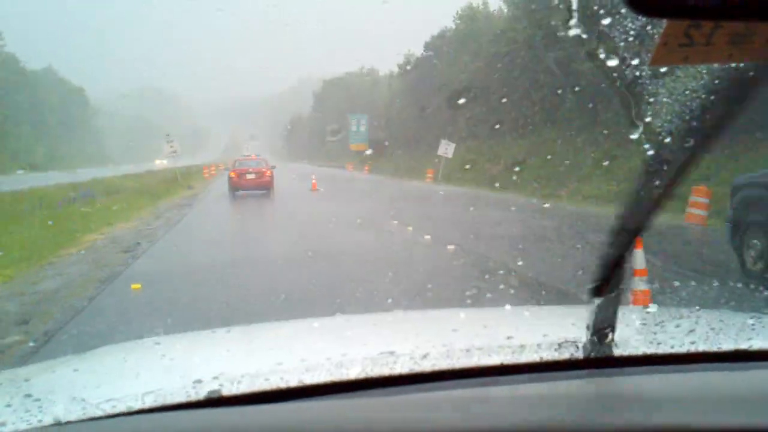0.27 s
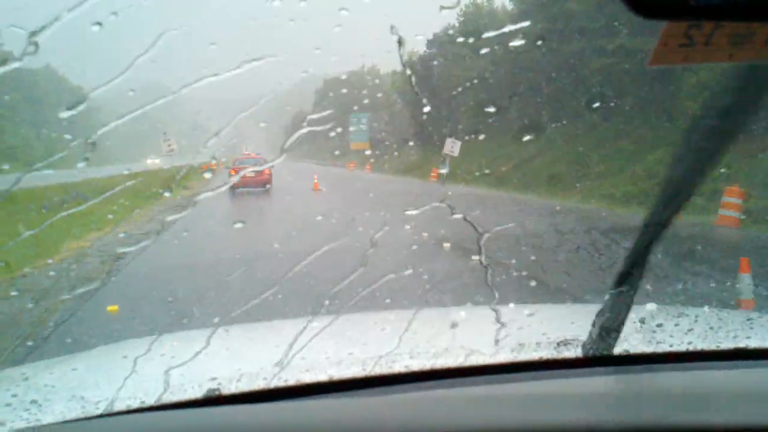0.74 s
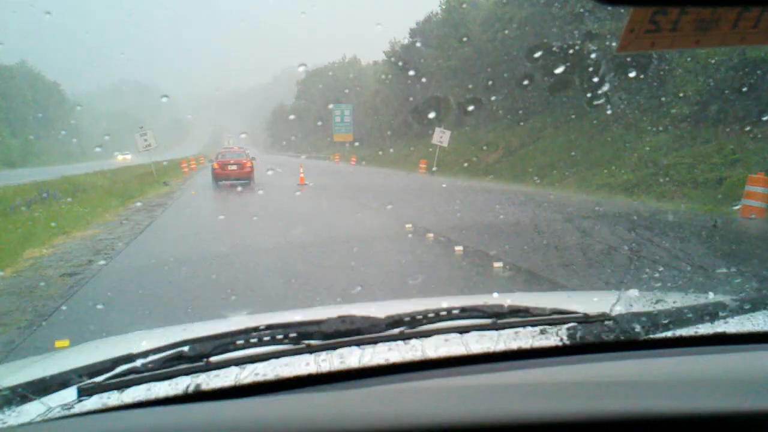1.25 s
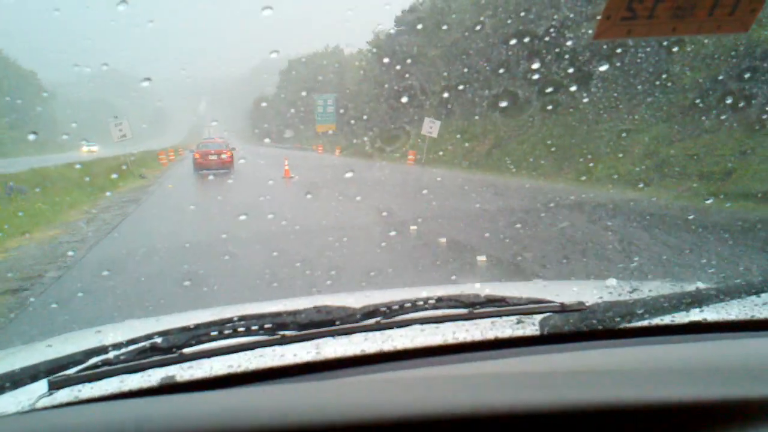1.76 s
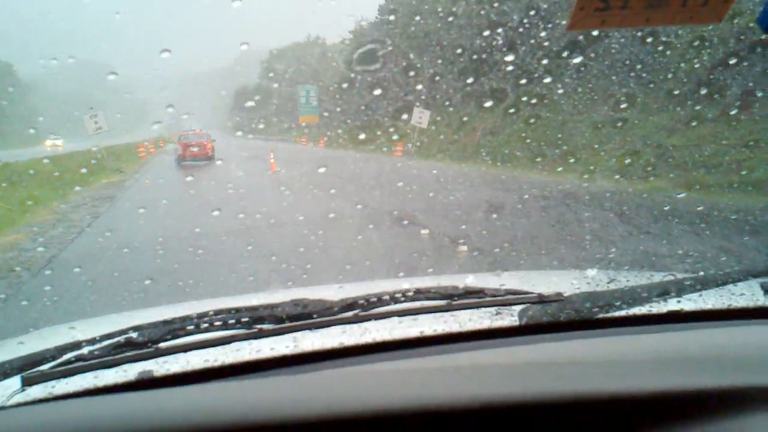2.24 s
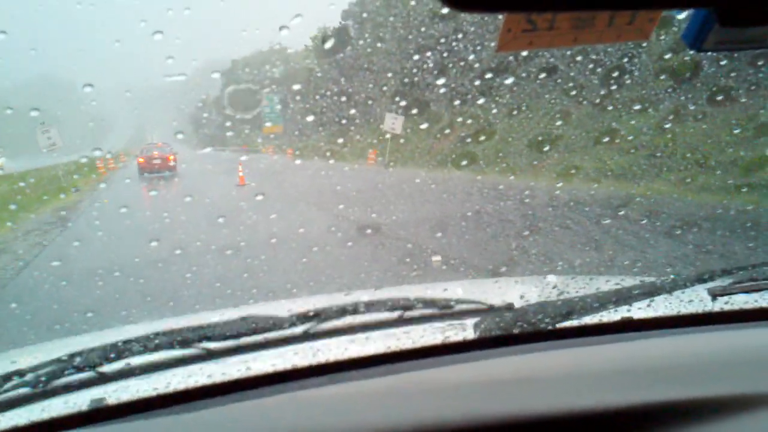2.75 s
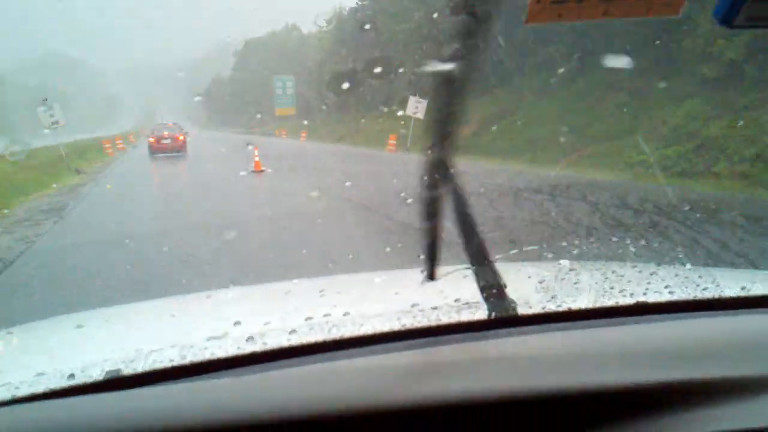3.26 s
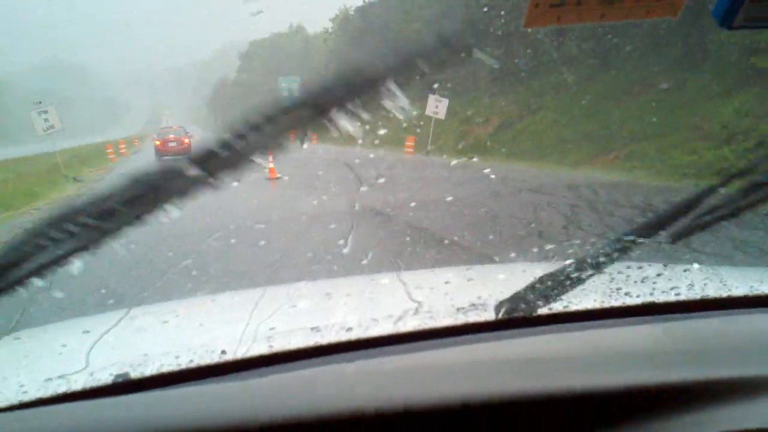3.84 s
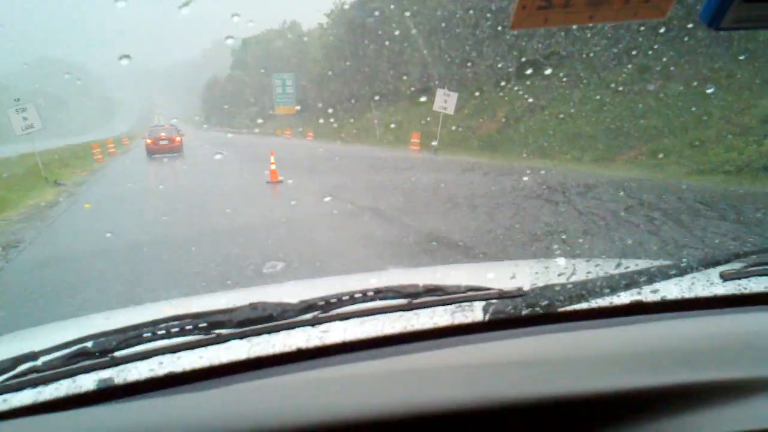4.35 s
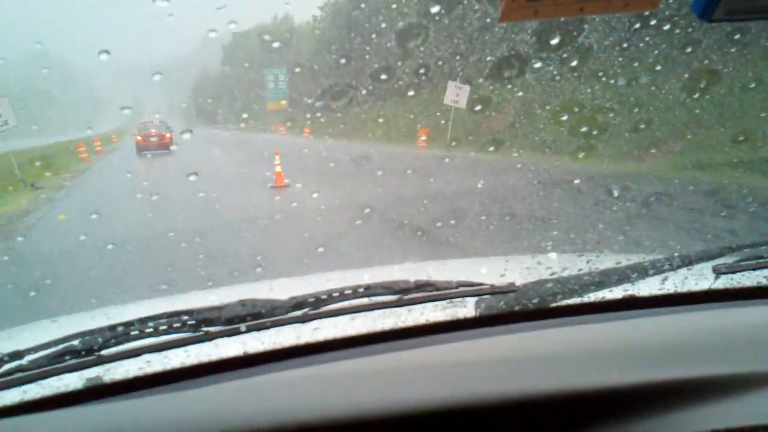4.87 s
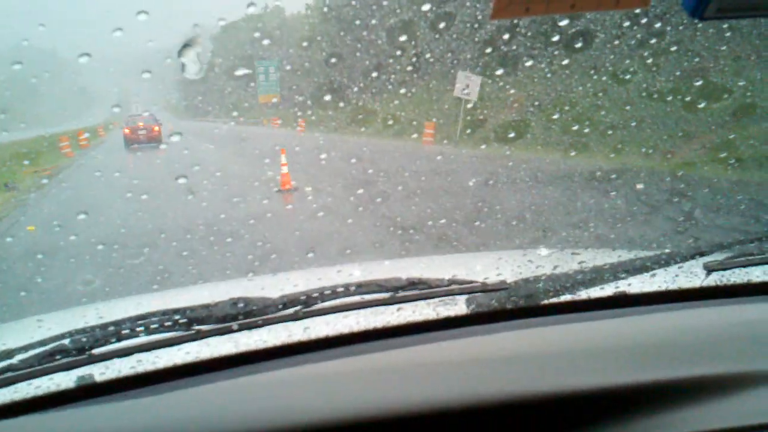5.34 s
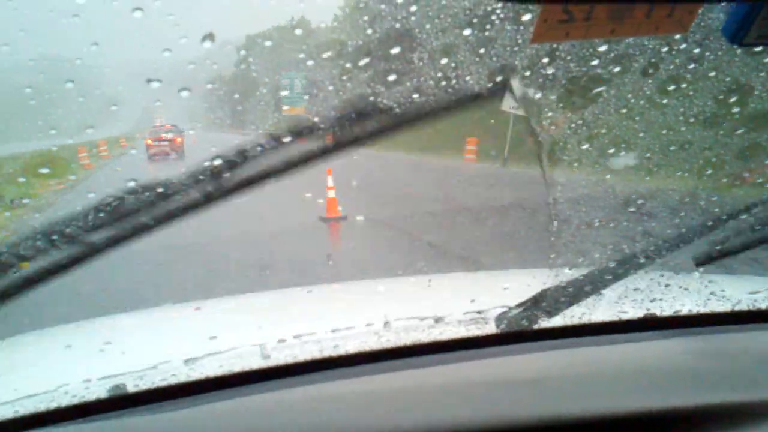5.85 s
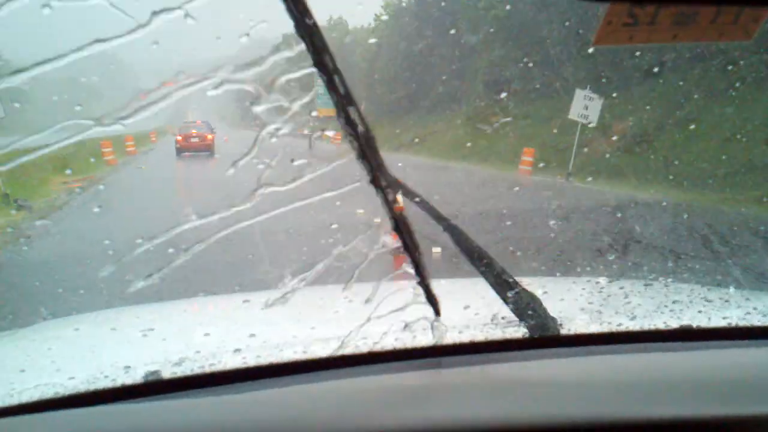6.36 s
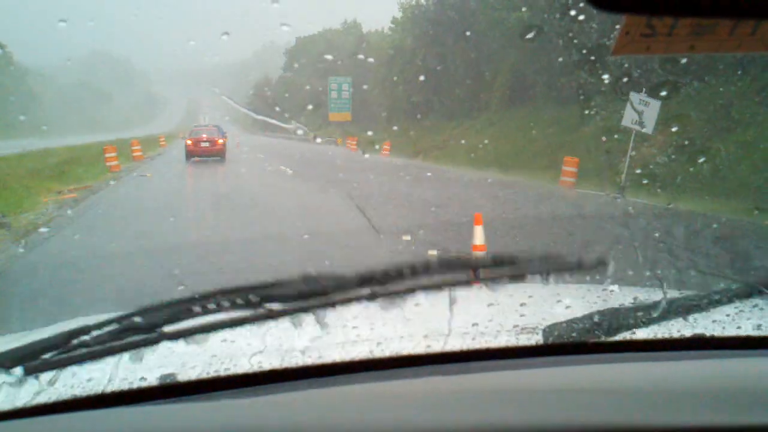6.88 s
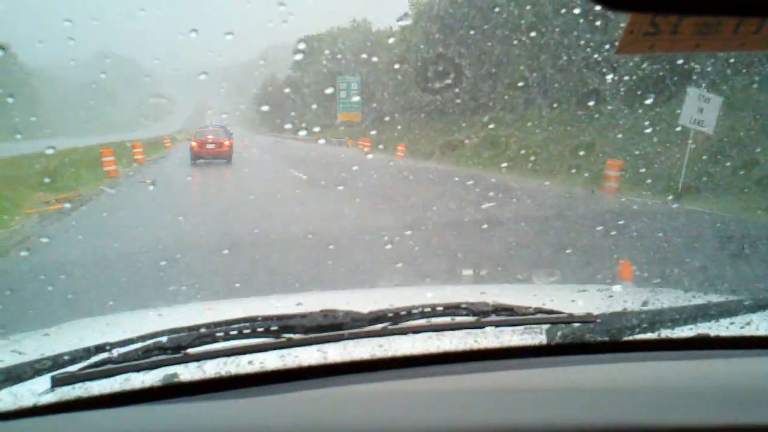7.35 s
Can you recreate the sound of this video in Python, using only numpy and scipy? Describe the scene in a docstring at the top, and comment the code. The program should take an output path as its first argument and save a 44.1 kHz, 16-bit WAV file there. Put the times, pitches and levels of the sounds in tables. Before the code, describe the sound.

Inside a car, hail knocks, cracks and ticks irregularly on roof and glass through dense rain patter, the engine rumbling softly.

```python
"""Inside a slow car in hail and heavy rain, on a phone's two microphones, close under roof and windscreen.
Big stones thud, knock and shatter on the panels; hard pellets tick on the glass and some ring a clear note.
Behind them lie a dense patter of small stones and drops, a small motor's hum and the engine's rumble.
The phone ducks its gain after hard blows and widens its stereo by feeding each microphone,
late and inverted, into the other side."""
import sys
import numpy as np
from scipy import signal
from scipy.fft import rfft, irfft, next_fast_len
from scipy.io import wavfile
from scipy.ndimage import uniform_filter1d

SR = 44100
rng = np.random.default_rng(int(sys.argv[2]) if len(sys.argv) > 2 else 0)


def unload_audio(sound):
    """Save the sound as a 16-bit wav file, at the path given as the first command line argument."""
    columns = np.transpose(np.atleast_2d(sound))
    # keep every value between -1 and 1, then stretch to whole-number steps
    steps = np.round(np.clip(columns, -1, 1) * 32767)
    wavfile.write(sys.argv[1], SR, steps.astype(np.int16))


N = 335601
TIME = np.arange(N) / SR

# big stones, at the panel: t/s, thud level/dB, knock level/dB, shatter level/dB, break-up/s, spot f/Hz
STONES = [(0.0447, -38, -34.5, -15, 0.0021, 1700), (0.1022, -35, -19.5, -6.5, 0.014, 780),
          (0.1633, -31, -23, -8, 0.0046, 2220), (0.1685, -28, -24, -8.5, 0.006, 2220),
          (.239, -20, -19, -13, 0.0082, 1900), (0.2841, -25, -23.5, -17, 0.012, 1590),
          (0.309, -25, -30, -18, 0.023, 1770), (0.353, -16, -14.5, -7.5, 0.013, 1240),
          (0.3765, -22, -28, -3, 0.0042, 3540), (.406, -15.5, -19.5, -5, 0.014, 800),
          (0.6126, -27, -23, -14, 0.0079, 1790), (0.628, -19.5, -33, -9, 0.0044, 1690),
          (.645, -23, -22, -18, 0.023, 1320), (0.6742, -14, -16, -0.5, 0.0094, 1390),
          (0.9842, -35, -15, -5.5, 0.0032, 3280), (1.2917, -47, -22.5, -28, 0.004, 835),
          (1.321, -16, -17, -7, 0.0017, 1000), (1.3233, -15.5, -25, -4, 0.014, 3630),
          (1.361, -22, -29, 4, 0.0021, 3360), (1.4056, -19.5, -32, -8.5, 0.0034, 1100),
          (1.492, -38, -42, -16.5, 0.013, 3500), (1.5393, -30, -29, -12.5, 0.02, 2110),
          (1.8175, -28, -24, -5, 0.004, 1880), (1.9727, -38, -22, -6, 0.0037, 1430),
          (1.9919, -24.5, -16, -2.5, 0.0016, 3700), (2.248, -35, -30, -16, 0.004, 1500),
          (2.289, -21.5, -16, -4.5, 0.0035, 2400), (2.353, -27.5, -19, -6, 0.005, 2400),
          (2.363, -23, -30, -15, 0.0045, 1200), (2.515, -26, -35, -17.5, 0.017, 805),
          (2.656, -38, -22.5, -13, 0.0032, 3560), (2.6865, -41.5, -27.5, -25, 0.024, 790),
          (2.8066, -19, -17.5, -4.5, 0.0072, 1760), (2.826, -25, -22.5, -31, 0.016, 1270),
          (2.851, -23, -22, -17, 0.012, 830), (2.873, -27, -35, -25, 0.009, 980),
          (2.972, -9.5, -4.5, -2.5, 0.0041, 2190), (2.993, -16, -17.5, -8, 0.012, 1200),
          (3.012, -21, -18, -4.5, 0.0088, 1990), (3.04, -20.5, -19, -25, 0.0052, 3220),
          (3.1921, -27, -25.5, -12, .018, 2100), (3.2561, -20.5, -11.5, -0.5, 0.011, 1420),
          (3.2641, -12.5, -14, -3, 0.004, 1410), (3.654, -27.5, -22.5, -11.5, 0.022, 760),
          (3.7, -31, -37, -28, 0.016, 1070), (3.723, -29, -24.5, -19.5, 0.013, 1110),
          (3.733, -30, -17, -6.5, 0.0086, 1890), (3.742, -28, -19.5, -6, 0.011, 1890),
          (3.803, -24, -34, -7, 0.0034, 3100), (3.8652, -21, -8.5, 7, 0.0014, 3330),
          (3.8898, -23.5, -6.5, 1.5, 0.0018, 3220), (3.9847, -36, -29.5, -18, 0.0053, 2940),
          (4.1353, -33, -36, -15.5, 0.0063, 810), (4.172, -23, -18, -5.5, 0.005, 1730),
          (4.178, -17.5, -16.5, -9, 0.0051, 1500), (4.255, -43, -33, -17.5, 0.021, 1500),
          (4.2957, -24, -32, -34, 0.0052, 1370), (4.395, -35, -35, -24, 0.031, 1510),
          (4.4585, -33.5, -27, -23.5, 0.019, 816), (4.625, -24.5, -28, -26, 0.012, 1410),
          (4.6853, -26, -21.5, -32, 0.0075, 850), (4.811, -44, -31, -14, 0.025, 1920),
          (4.9624, -30, -38, -22, 0.0096, 790), (5.147, -35.5, -32, -17.5, 0.0095, 3500),
          (5.188, -53, -18.5, -2.5, 0.011, 2200), (5.3293, -27.5, -32, -23, 0.017, 865),
          (5.419, -32, -34, -18.5, 0.0053, 2020), (5.4577, -28.5, -29, -27, 0.0039, 1240),
          (5.496, -41, -41, -21, 0.0027, 1980), (5.5858, -30.5, -21.5, -9, 0.0087, 1920),
          (5.741, -24.5, -18, -13, 0.0049, 1790), (5.7455, -19.5, -18, -19, 0.0099, 1500),
          (5.9265, -31.5, -24, -13, 0.022, 1100), (6.0335, -39, -24, -27, 0.0007, 1860),
          (6.0885, -23.5, -20, -4.5, 0.007, 1830), (6.0944, -18.5, -15, -2.5, 0.0069, 1520),
          (6.112, -30, -34, -19, 0.0084, 2000), (6.1361, -19, -18, -2.5, 0.0026, 2260),
          (6.332, -29, -35, -15.5, .013, 930), (6.3978, -27, -29, -12.5, 0.021, 790),
          (6.4642, -18, -11, 2, 0.0017, 3360), (6.4824, -21, -15.5, -3, 0.0031, 3490),
          (6.5527, -38, -23, -16, 0.0076, 800), (6.575, -32, -29, -20, 0.035, 1430),
          (6.6333, -33, -27, -27, 0.017, 1320), (6.672, -18, -10.5, 2.5, 0.0018, 3470),
          (6.7343, -29, -36, -7, 0.0023, 3960), (6.766, -35, -18, -11, 0.0041, 2470),
          (6.786, -22, -9, -2, 0.0013, 835), (6.881, -34, -28, -17, 0.0011, 940),
          (6.9468, -17, -12, 2, 0.0025, 2420), (7.0246, -21, -30, -7.5, 0.011, 3100),
          (7.1741, -26, -38, -22, 0.0076, 920), (7.2433, -35, -26.5, -12, 0.02, 3660),
          (7.529, -28, -32.5, -19.5, 0.006, 810), (7.5658, -22, -30, -11.5, 0.022, 860)]
# modes of roof and glass: f/Hz, level/dB, share of the ring time (capped by damping)
PANEL_MODES = [(218, -4.5, 1.3), (272, 0, 1.8), (327.7, 4, 1.07), (338.6, -4, 1), (425, -25, 0.98),
               (488, -18, 2.7), (566, -2.5, 1.17), (614.6, -3.5, 1.9), (705, -31, 0.41), (754.7, 3.5, 0.95),
               (826, 2, 1.76), (874, -3, 3.1), (962, 5, 0.5), (1052, 2, 0.89), (1163, 2, 2.1),
               (1231, -2, 1.5), (1380, -7, 1.4), (1350, -7, 0.25), (1652, 3, 0.7), (1775, 2.5, 4.3),
               (1980, -8, 2.4), (2150, -2, 1.9), (2298, 11, 1.37), (2510, -22, 0.74), (3100, -19, 0.49),
               (3440, 3.5, 1.2), (3460, 12, 0.73)]
# hard pellets, at the glass: t/s, ring level/dB, snap level/dB, bounces (rounded)
TICKS = [(.039, -1, -4, 0), (0.0482, 2.5, 1.5, -0.5), (0.169, 10, 4, 0), (.284, -4, -3, 0),
         (0.2918, 1, 1.5, 1), (.3425, -8, 0, 0), (0.3476, 7.5, 3, 0), (0.3793, 14, 14, 0),
         (.5103, -15, -15, 0), (0.545, 5, -6, 0), (0.575, 5, -2, 0), (.617, -3, -12, 0),
         (0.985, -3, 15.5, -0.5), (1.2818, -1, -3, 0), (1.295, -3, 0, 0), (1.3412, 16, 10, 1),
         (1.361, 12, 13, 0), (1.3667, 17, 6, 0), (1.407, -14, 9, 0), (1.8214, -3, 8, 0),
         (1.9073, -12, -1, 0.5), (1.9956, 13.5, 9, 0), (2.3538, -12, 10.5, 0), (2.325, -13, -4, 0),
         (2.383, -12, 0, 0), (2.561, -21, -10, 0), (2.588, -18, -7, 0), (2.602, -21, -9, 0),
         (2.905, -8.5, 4, 3.5), (2.9281, -11, 1, 1), (2.944, -14, -7, 0), (2.956, -18, 2, -0.5),
         (2.9643, -4, -3, 0), (3.191, -15, -2, 0), (3.2056, 9, 3, -0.5), (3.241, -10.5, -4, 1),
         (3.54, -14, -4, 0), (3.6841, 1, -1, -0.5), (3.7982, -20, 2, -0.5), (3.8032, -3, 12.5, 1),
         (3.8299, -1, 2, 3), (3.8649, 17, 20.5, 0.5), (3.8913, 11.5, -3, 2), (3.9895, -13, -8, 0),
         (4.116, 1, -2, 0), (4.1055, -20, -8, -0.5), (4.1249, -22, -7, -0.5), (4.135, -2, -9.5, 0),
         (4.4514, -10, -8, 0), (5.0909, -15, -11, 0), (5.1231, -23, -7, 0), (5.5405, -7, -5, 0),
         (6.025, -2, 3, 0), (6.0334, -11, 0, 0.5), (6.039, -15, -5, 0), (6.054, -4, -10, 0),
         (6.0705, -11.5, 3, 0), (6.075, -9, 5, 0.5), (6.1401, 17, -8, 0), (6.333, 4, -9, 0),
         (6.4637, -1, 3, 0), (6.6463, -7, -7, 0), (6.672, 12, 17.5, 0.5), (6.7054, -0.5, -11, 1),
         (6.7191, 6, 11.5, 0), (6.7369, -9, 0, 0), (6.7657, 14, -3, 0.5), (6.7877, 11, 16.5, 0),
         (6.8824, 7, 10, -0.5), (6.887, -5, -2, 0.5), (6.947, -9, 7, 2), (7.4, -3.5, -9, 0.5),
         (7.535, -2, -15, 1.5)]
# clear notes of glass or roof: t/s, f/Hz, level/dB, t60/s
PINGS = [(.107, 3500, -6, .04), (.1695, 3550, -18, .03), (.3803, 3740, 1, .03), (.676, 312, -24, 0.23),
         (1.3612, 3440, 4, .03), (1.9935, 3800, -4, .035), (2.291, 1870, -15, .04),
         (2.2895, 2990, -3, 0.04), (2.354, 6550, 7, .03), (2.355, 830, -10.5, 0.074),
         (2.355, 1200, -18.5, 0.12), (2.81, 510, -26, 0.15), (3.26, 473, -14, 0.1), (3.262, 297, -20, .12),
         (5.745, 306, -42, 0.097), (6.094, 314, -18, 0.16), (6.094, 268, -22, 0.16), (2.974, 3760, -3, .04),
         (3.8665, 3400, -13, .04), (3.865, 6440, -5, .03), (6.14, 3870, -1, .03), (6.464, 3980, 10.5, 0.02),
         (6.4645, 3460, 1, 0.06), (6.673, 3420, 0, 0.041), (6.6725, 6300, 3.5, 0.023),
         (6.787, 3240, -20, .03), (6.9475, 3450, -15, 0.028), (6.948, 6740, 16, 0.022)]
# small stones and drops, at the panels: t/s, drumming level/dB, spray level/dB
PATTER = [(0, -22.5, -19), (.3, -29.5, -22), (.6, -25, -20), (1.1, -25, -20), (1.7, -25.5, -21.5),
          (2.1, -26, -22), (2.6, -30, -25.5), (2.9, -26, -21), (3.4, -27, -25.5), (3.9, -29.5, -26),
          (4.6, -28, -25.5), (5.102, -27.5, -26), (5.6, -28, -21.5), (6.2, -26.5, -22), (6.6, -24.5, -18),
          (7, -28.5, -23), (7.4, -28, -25), (7.61, -28.5, -19)]
# motor tone: t/s, f/Hz, level/dB
HUM = [(0, 372, -27), (.55, 372, -29), (.9, 372, -26), (2.9, 374, -26), (3.05, 380, -36), (3.3, 383, -34),
       (3.5, 385, -28), (4.4, 385, -27.5), (5.0, 385, -26.5), (5.6, 386, -25), (6.4, 385, -25),
       (7, 381, -25.5), (7.61, 378, -26)]
# engine and road: t/s, level/dB
RUMBLE = [(0, -27), (.7, -21.5), (1.5, -24.5), (2.5, -27.5), (3.2, -23), (3.8, -27.5), (5, -27),
          (5.6, -26.5), (6.2, -22), (6.8, -25), (7.61, -27.5)]
# colour of the cabin, from the panels to the phone: f/Hz, level/dB
CABIN = [(60, -30), (120, 10), (220, 5), (400, 8.5), (900, -4), (2000, -4.5), (3200, -12), (4200, -18.5),
         (5200, -23), (6500, -21), (9000, -21), (11000, -23.5), (14000, -25.5)]
# how far the two microphones differ, as a gain on the side signal: f/Hz, level/dB
SIDE_GAIN = [(30, -69), (150, -16), (400, -13), (1000, -3.5), (2000, 1), (4000, -2), (14000, 0.5)]
# left channel against right: f/Hz, level/dB
LEFT_GAIN = [(60, -2), (300, -5), (800, -2.5), (1300, 0.1), (14000, -0.5)]


def blow(rise_s, hold_s, t60_s, spot_hz, size=5000):
    """One stone overhead: thud and knock of the panels, shatter of the ice, each as mid and side."""
    t = np.arange(size) / SR
    hz, db, share = (column[:, None] for column in np.transpose(PANEL_MODES))
    chance = rng.standard_normal((4, len(PANEL_MODES), 1))
    noise = rng.standard_normal((3, 2, size))
    decay = np.log(1000) * np.maximum(t - hold_s, 0) / max(t60_s, .005)
    # each blow drives the modes unevenly and a little off pitch, favouring those near the spot's pitch
    phase = np.float32(2 * np.pi * hz * (1 + 0.0296 * chance[0]) * t + 1.8 * chance[1])
    modes = np.sin(phase) * np.exp(np.float32(-decay / np.minimum(share, 1.4)))
    near = .4 + 1 / (1 + (np.log2(hz / spot_hz) / .2) ** 2)
    drive = near * undb(db) * chance[2:]
    low = hz[:, 0] < 920
    low_ring, high_ring = ((modes[k] * drive[:, k]).sum(1) / np.linalg.norm(drive[:, k], axis=1)
                           for k in (low, ~low))
    thud = 0.92 * low_ring + 0.72 * unit(band(noise[0], 208, 1185)) * np.exp(-decay / 2.18)
    crack = 0.96 * unit(band(noise[1], 730, 4650))
    spot = .5 * unit(band(noise[1], 0.81 * spot_hz, 1.26 * spot_hz))
    knock = 1.02 * high_ring + (crack + spot) * np.exp(-decay)
    sizzle = undb(-1.5 + 1.7 * chance[0, 0, 0]) * unit(band(noise[1], 9900, 17200))
    shatter = 0.82 * (unit(band(noise[2], 2760, 9400)) + sizzle) * np.exp(-decay / 0.84)
    # the lows build up slower than the highs
    rise = 1 - np.exp(-t / (rise_s + np.reshape([.002, .0003, .0003], (3, 1, 1))))
    # the stone breaks in uneven crumbs, 1.5 ms apart
    step, scatter_db = int(.0015 * SR), np.reshape([1, 2, 2], (3, 1, 1))
    crumbs = np.repeat(rng.standard_normal((3, 1, 200)), step, axis=2)
    crumbs = uniform_filter1d(crumbs, step)[..., :size]
    return np.array([thud, knock, shatter]) * rise * undb(scatter_db * crumbs)


def big_stones():
    """Soft stones that crumble slowly build up slowly; quick hard ones and high spots ring briefly."""
    out = np.zeros((2, N))
    for s, *levels_db, hold_s, spot_hz in STONES:
        rise_s = 0.00018 + 0.24 * max(hold_s - 0.0098, 0)
        t60_s = 0.15 * (1 - np.exp(-hold_s / 0.0032)) * (spot_hz / 1500) ** -0.095
        add(out, np.tensordot(undb(levels_db), blow(rise_s, hold_s, t60_s, spot_hz), 1), s)
    return out


def tick(size=600):
    """One click on the glass: a short ring of the pane and a bright snap, each as mid and side."""
    fade = -np.log(1000) * np.arange(size) / SR
    noise = rng.standard_normal((2, 2, size))
    noise[:, :, 0] = 2.1 * np.sign(noise[:, :, 0])  # spike of first contact
    snap_hz = 7960 * 2 ** np.clip(0.17 * rng.standard_normal(), -1, 1)
    ring = band(noise[0] * np.exp(fade / 0.0059), 2650, 4800)
    snap = band(noise[1] * np.exp(fade / 0.0065), 0.62 * snap_hz, 1.8 * snap_hz)
    return np.array([ring, snap])


def pellets(bounce_s=0.0045, bounce_db=-0.5):
    """Hard pellets hit the windscreen; some bounce, a little weaker each time."""
    out = np.zeros((2, N))
    for s, ring_db, snap_db, bounces in TICKS:
        for k in range(round(bounces) + 1):
            gains = undb([ring_db, snap_db]) * undb(k * bounce_db)
            add(out, np.tensordot(gains, tick(), 1), s + k * bounce_s)
    return out


def pings(rise_s=0.00029, size=6000):
    """Hard stones make a single note of glass or roof ring clear."""
    out = np.zeros((2, N))
    t = np.arange(size) / SR
    for s, hz, db, t60_s in PINGS:
        phase = rng.random() * 2 * np.pi + np.array([[0], [1.0]])  # mid, side
        envelope = np.exp(-np.log(1000) * t / t60_s) * (1 - np.exp(-t / rise_s))
        add(out, undb(db) * np.sin(2 * np.pi * hz * t + phase) * envelope, s)
    return out


def stray_pellets(per_s=18, scatter_db=1.5):
    """Lesser pellets tick on the glass at random, each its own size and brightness."""
    out = np.zeros((2, N))
    count = int(per_s * N / SR)
    for when, ring, snap in np.c_[rng.random(count), rng.standard_normal((count, 2))]:
        gains = undb([-15 + scatter_db * ring, -15.5 + scatter_db * snap])
        add(out, np.tensordot(gains, tick(), 1), when * N / SR)
    return out


def patter(per_s=700, scatter_db=4.0, most_db=10.5, spots=9):
    """Countless small stones and drops of uneven size drum and spray on a few spots of the panels."""
    drum, spray = 0, 0
    for spot_hz in np.geomspace(700, 3000, spots):
        lands = rng.random(N) < per_s / spots / SR
        hits = lands * undb(np.minimum(scatter_db * rng.exponential(size=N), most_db))
        thud, knock, shatter = blow(0, 0.0011, 0.065, spot_hz)
        splash = shatter[:, :3000] + 4.6 * tick(size=3000).sum(0)
        drum += signal.oaconvolve(hits[None], thud + undb(-3) * knock)[:, :N]
        spray += signal.oaconvolve(hits[None], splash)[:, :N]
    # fine rain fills the gaps with a flickering hiss
    hiss = rng.standard_normal((2, 2, N)) * undb(walk(25))
    drum = unit(drum) + 0.54 * unit(band(hiss[0], 160, 3460))
    spray = unit(spray) + 0.41 * undb(2.4 * walk(12)) * unit(band(hiss[1], 4000, 10000))
    spray += 0.4 * undb(4.4 * walk(18)) * unit(band(hiss[0], 10800, 15000))
    s, drum_db, spray_db = np.transpose(PATTER)
    return drum * undb(np.interp(TIME, s, drum_db)) + spray * undb(np.interp(TIME, s, spray_db))


def motor_hum(side_lead_rad=1.15):
    """A small motor holds one tone, wavering in pitch and level."""
    s, hz, db = np.transpose(HUM)
    phase = 2 * np.pi * np.cumsum(np.interp(TIME, s, hz) + 1.2 * walk(20)) / SR
    level = undb(np.interp(TIME, s, db) + walk(10))
    return level * np.sin(phase + np.array([[0], [side_lead_rad]]))


def engine_rumble(centre_hz=142.3, width_hz=79):
    """Engine and road come up through the floor as a low band of noise."""
    rumble = band(rng.standard_normal((2, N)), centre_hz - width_hz / 2, centre_hz + width_hz / 2)
    return unit(rumble) * undb(np.interp(TIME, *np.transpose(RUMBLE)))


def microphone_shake():
    """Each microphone shakes on its own, deep and unsteady."""
    return unit(band(rng.standard_normal((2, N)), 43, 73.6)) * undb(-47.5 + 1.8 * walk(17))


def widen(x, delay_s=0.0003835, bass_gain=0.95, treble_gain=0.21, corner_hz=4130):
    """Each side gets the other microphone late and inverted, weaker in the treble."""
    size = next_fast_len(N + SR)
    hz = np.arange(size // 2 + 1) * SR / size
    share = treble_gain + (bass_gain - treble_gain) / (1 + (hz / corner_hz) ** 4)
    late = irfft(rfft(x[::-1], size) * share * np.exp(-2j * np.pi * hz * delay_s), size)
    return x - late[:, :N]


def duck(x, threshold_db=-22, share=0.65, sense_s=0.022, attack_s=0.051, recover_db_per_s=3):
    """The phone's gain control cuts a share of the level over a threshold, then creeps back."""
    level_db = 10 * np.log10(lag(np.mean(x ** 2, 0), sense_s) + 1e-12)
    wanted_db = share * np.maximum(level_db - threshold_db, 0)
    back_db = recover_db_per_s * TIME
    cut_db = np.maximum.accumulate(wanted_db + back_db) - back_db
    return x * undb(-lag(cut_db, attack_s))


def undb(db):
    return 10 ** (np.asarray(db) / 20)


def unit(x):
    """Scale to rms 1."""
    return x / np.sqrt(np.mean(x ** 2, axis=-1, keepdims=True))


def band(x, lo_hz, hi_hz):
    """Band-pass along time."""
    return signal.lfilter(*signal.butter(2, [lo_hz, min(hi_hz, .45 * SR)], "band", fs=SR), x)


def colour(x, table):
    """Weight the spectrum by points of f/Hz, level/dB."""
    size = next_fast_len(x.shape[-1])
    hz, db = np.transpose(table)
    gain = undb(np.interp(np.log(np.arange(size // 2 + 1) * SR / size + 1), np.log(hz), db))
    return irfft(rfft(x, size) * gain, size)[..., :x.shape[-1]]


def walk(rate):
    """Random levels held 1 / rate s and slewed; spread near 1."""
    k = int(SR / rate)
    steps = np.repeat(rng.standard_normal(N // k + 1), k)
    return 1.42 * uniform_filter1d(uniform_filter1d(steps, k), k)[:N]


def lag(x, time_s):
    """One-pole smoothing."""
    k = np.exp(-1 / (time_s * SR))
    return signal.lfilter([1 - k], [1, -k], x)


def add(out, sound, s):
    """Mix a sound in at a time."""
    i = int(s * SR)
    out[:, i:i + sound.shape[1]] += sound[:, :N - i]


def scene():
    """The cabin at the two microphones: sources mixed as mid and side, then turned to left and right."""
    hail = big_stones() + pellets() + pings() + stray_pellets() + patter()
    mid, side = colour(hail, CABIN) + motor_hum() + engine_rumble()
    side = colour(side, SIDE_GAIN)
    right = np.roll(mid - side, 1)  # sound reaches the right microphone one sample later
    low_cut = signal.butter(2, 70, "high", fs=SR, output="sos")
    return signal.sosfilt(low_cut, [mid + side, right]) + microphone_shake()


def record(dry):
    """The phone widens the stereo, ducks its gain, thins the left channel's lows and cuts the top."""
    left, right = duck(widen(dry) * undb(-4))
    stereo = np.clip([colour(left, LEFT_GAIN), right], -1, 1)
    return signal.sosfilt(signal.ellip(10, .3, 70, 13900, fs=SR, output="sos"), stereo)


dry = scene()
out = record(dry)
unload_audio(out)
```